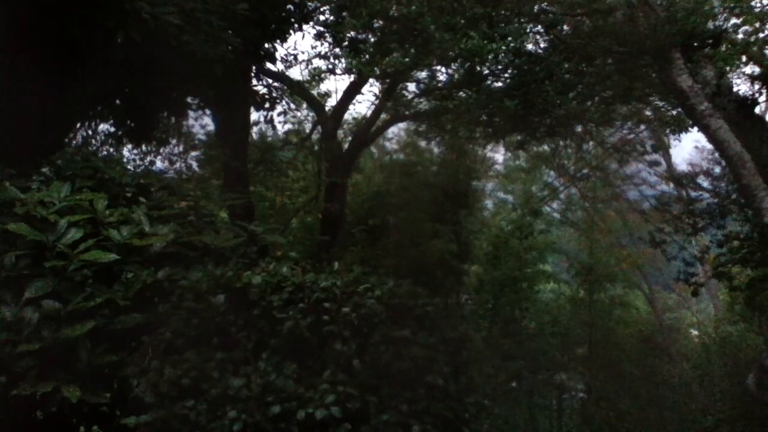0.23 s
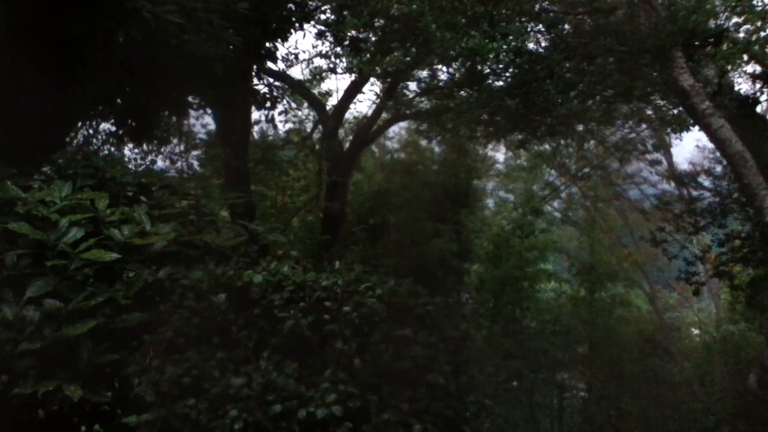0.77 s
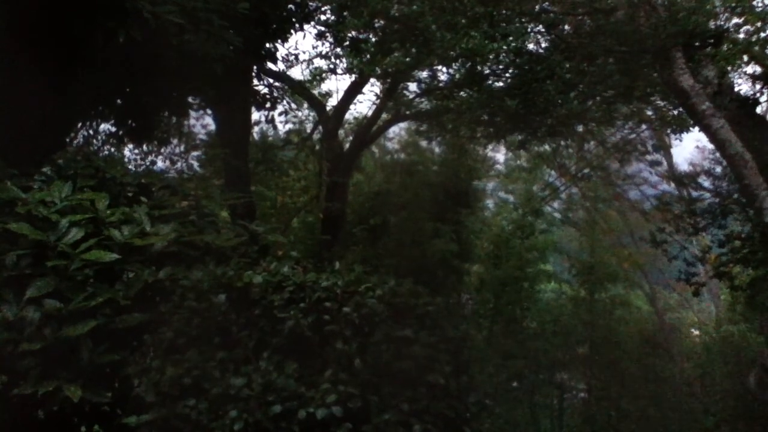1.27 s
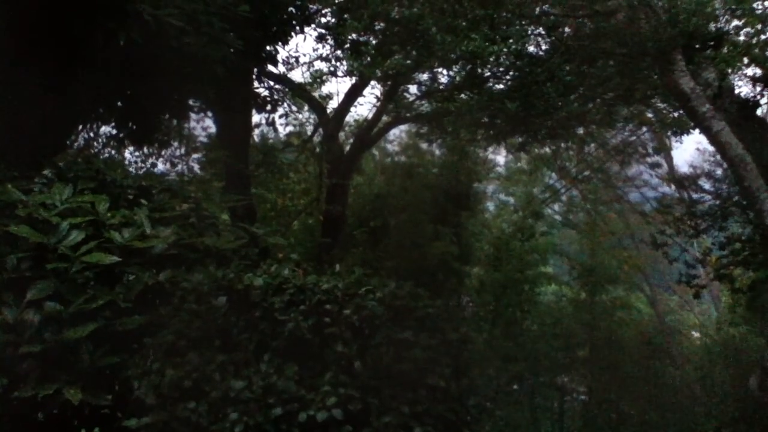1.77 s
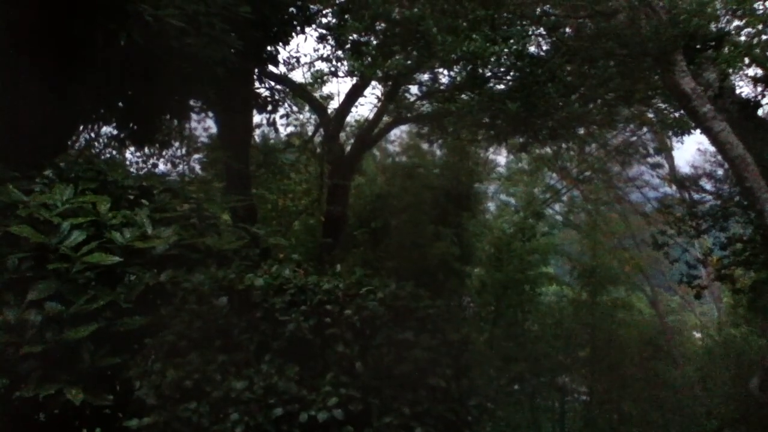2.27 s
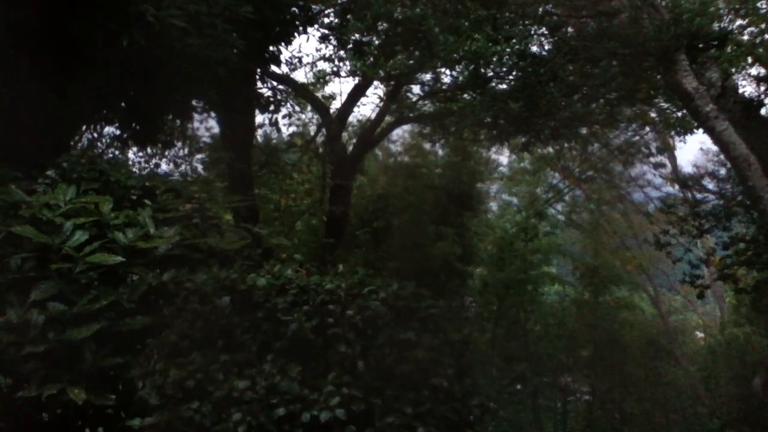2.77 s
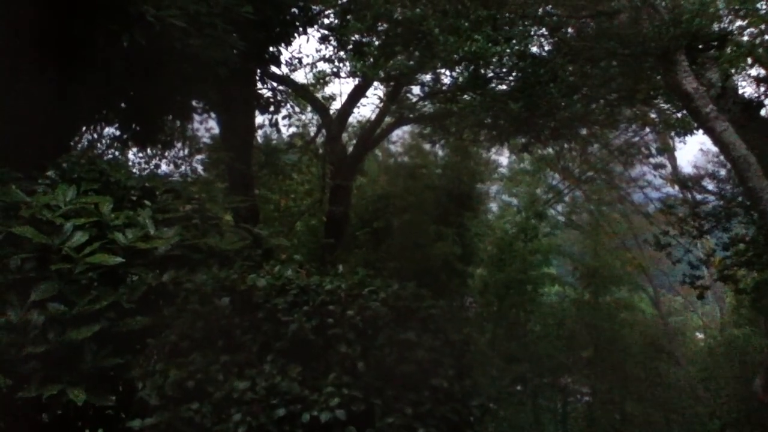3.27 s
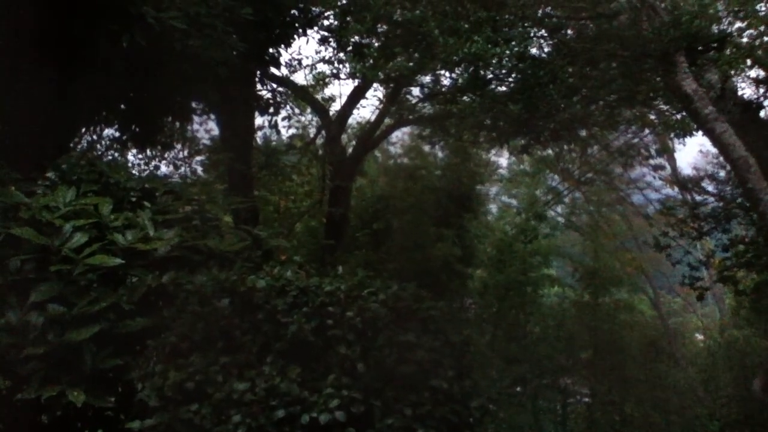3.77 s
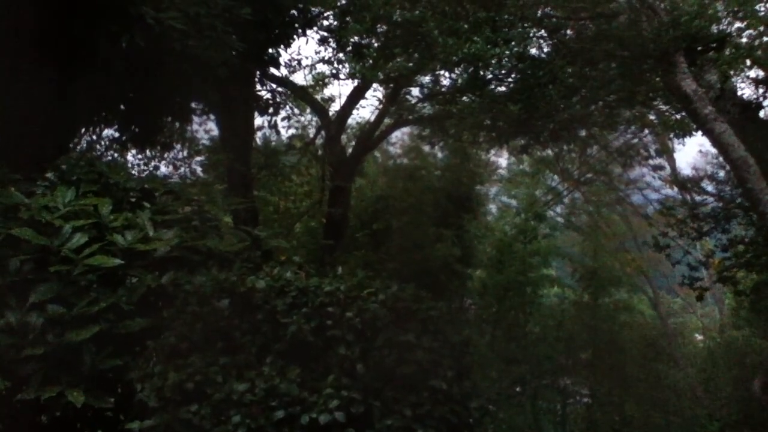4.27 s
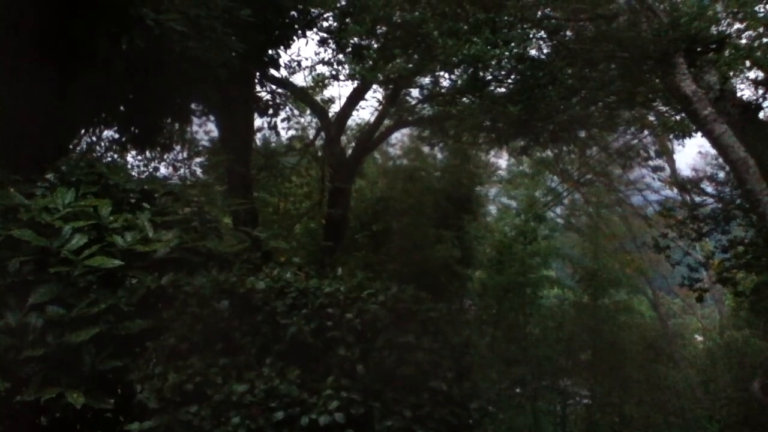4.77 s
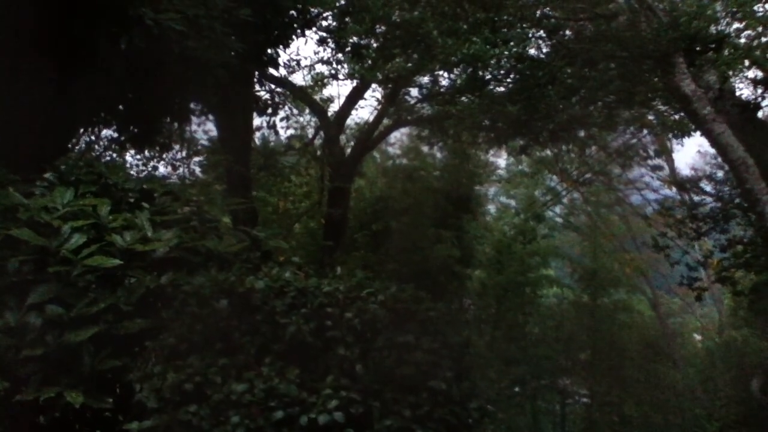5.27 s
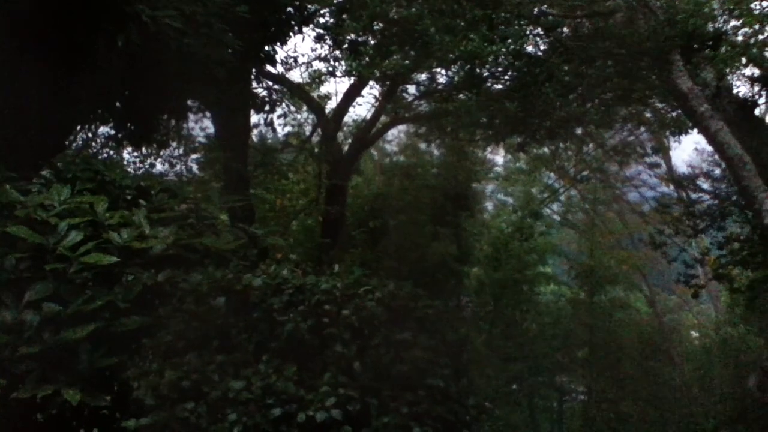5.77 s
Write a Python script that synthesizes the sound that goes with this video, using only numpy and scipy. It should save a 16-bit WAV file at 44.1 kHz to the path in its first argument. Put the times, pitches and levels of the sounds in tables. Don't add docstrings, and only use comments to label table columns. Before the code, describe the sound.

A near cicada shrills without pause, harsh and very high, over distant buzzing insects, thin cricket trills and a faint stream in dusky forest.

```python
import sys
import numpy as np
from scipy import signal
from scipy.fft import rfft, irfft, next_fast_len
from scipy.io import wavfile
from scipy.ndimage import uniform_filter1d

SR = 44100
rng = np.random.default_rng(int(sys.argv[2]) if len(sys.argv) > 2 else 0)


def inscribe(sig):
    pcm = np.round(np.clip(np.atleast_2d(sig).T, -1, 1) * 32767)
    wavfile.write(sys.argv[1], SR, pcm.astype(np.int16))


def ratio(d):
    e = np.asarray(d, float) / 20
    return 10 ** e


N = 265923
T = np.arange(N) / SR


def level(x, db):
    return x * ratio(db) / np.sqrt(np.mean(x ** 2))


def curves(table):
    s, *columns = np.transpose(table)
    return [np.interp(T, s, c) for c in columns]


def colour(x, points):
    hz, db = np.transpose(points)
    size = next_fast_len(N)
    f = np.maximum(np.arange(size // 2 + 1) * SR / size, 1)
    gain = ratio(np.interp(np.log(f), np.log(hz), db))
    return irfft(rfft(x, size) * gain, size)[:N]


def walk(rate_hz):
    hold = int(SR / rate_hz)
    steps = np.repeat(rng.standard_normal(N // hold + 1), hold)
    return 1.3 * uniform_filter1d(uniform_filter1d(steps, hold), hold)[:N]


def ticks(rate_hz):
    turns = np.cumsum(rate_hz) / SR
    return np.interp(np.arange(1, int(turns[-1])), turns, T)


def rings(times, hz, width_hz, size, count=256):
    at = np.ceil(times * SR).astype(int)[:, None] + np.arange(count)
    t = at / SR - times[:, None]
    envelope = size[:, None] * t * np.exp(-2 * np.pi * width_hz * t)
    wave = envelope * np.sin(2 * np.pi * hz[:, None] * t)
    return np.bincount(np.clip(at, 0, N).ravel(), wave.ravel(), N + 1)[:N]


def trunks(x, t60_s, wet_db):
    t = np.arange(int(t60_s * SR)) / SR
    decay = np.exp(-np.log(1000) * t / t60_s)
    echoes = rng.standard_normal(len(t)) * decay * np.minimum(t / 0.0093, 1)
    echoes = echoes / np.sqrt(np.sum(echoes ** 2))
    return x + ratio(wet_db) * signal.fftconvolve(x, echoes)[:N]


# frequency in Hz, noise density in dB per Hz.
AIR_HZ_DB = [(15, -57.5), (25, -14), (124, -4.5), (343, -9.5), (397, -11.5), (450, -11), (711, -16.5),
             (1600, -16), (1890, -9.5), (2100, -7), (2430, -12.5), (2920, -10.5), (3600, -3.5),
             (4680, -8.5), (7920, -120)]


def air():
    return level(ratio(0.5 * walk(2.32)) * colour(rng.standard_normal(N), AIR_HZ_DB), -52)


def tree_crickets(count=24):
    out = 0
    for spread in np.linspace(-1, 1, count):
        times = ticks(38 * (1 + 0.15 * walk(1.5)))
        hz = 2110 + 105 * spread + 8 * rng.standard_normal(400)[:len(times)]
        late_s = 0.02 * rng.random()
        pulses = rings(times - late_s, hz, 16.3, 1 + 0 * times, count=1536)
        out = out + ratio(3.4 * walk(4.36)) * pulses
    early_db, settle_s = 4.5, 0.4
    return ratio(early_db * np.exp(-T / settle_s)) * level(trunks(out, 0.84, 1), -56)


def throbs(calls, drum_hz, width_hz):
    throb_s = 0.32
    out = 0
    for middle_s, snap_hz, db in calls:
        u = np.arange(-0.5, 0.5, 1 / (snap_hz * throb_s))
        times = np.maximum(middle_s + u * throb_s, 0)
        size = np.cos(np.pi * u) * (times > 0)
        throb = rings(times, drum_hz + 0 * u, width_hz, size)
        out = out + level(throb, db + 10 * np.log10(throb_s * SR / N))
    return trunks(out, 0.27, 0.74)


# middle in seconds, pulse rate in Hz, level in dB.
CROAKS = [
    (4.3, 323, -74.5),
    (5.4, 319.6, -75),
]


def frog():
    return throbs(CROAKS, drum_hz=1150, width_hz=220)


# middle in seconds, snap rate in Hz, level in dB.
FAINT_THROBS = [(.05, 341, -67), (.78, 340.6, -64), (1.15, 328, -65.5), (1.68, 342, -78), (2.4, 345, -66),
                (3.03, 342.5, -62), (3.76, 353.5, -64), (4.5, 340, -68), (5.22, 332, -68), (5.92, 355, -63)]


def faint_caller():
    return throbs(FAINT_THROBS, drum_hz=3440, width_hz=550)


def fading_cricket():
    times = ticks(55 + 6 * walk(6))
    hz = 4150 + 25 * rng.standard_normal(600)[:len(times)]
    trill = rings(times, hz, 40, 1 + 0 * times, count=1024)
    fade_db_s = 4
    return ratio(1.5 * walk(5.5) - fade_db_s * T) * level(trunks(trill, 0.41, 2.3), -54)


# start in seconds, peak in dB, pitch in Hz.
PIP_EVENTS = [(5.1397, -34, 6000), (5.39, -33, 5970), (5.552, -31, 5990), (5.7116, -36, 6340),
              (5.806, -29, 6000)]


def crickets():
    times = ticks(31 + 3 * walk(5))
    hz = 4700 + 12 * rng.standard_normal(400)[:len(times)]
    trill = rings(times, hz, 21, 1 + 0 * times, count=2048)
    mean_db, gain_db_s, depth_db = -55, 2.0, 5
    phrase_s, phrase_top_s = 0.699, 3.53
    phrase = np.cos(2 * np.pi * (T - phrase_top_s) / phrase_s)
    phrase_db = mean_db + gain_db_s * T + depth_db * phrase
    s, db, pip_hz = np.transpose(PIP_EVENTS)
    pips = rings(s, pip_hz, 42, 480 * ratio(db), count=2048)
    return ratio(phrase_db) * level(trill, -9) + trunks(pips, 0.3, -14)


# start in seconds, length in seconds, pitch in Hz, level in dB.
RASP_EVENTS = [
    (.2, 0.091, 4900, -49),
    (.67, 0.11, 4900, -47),
    (1.27, 0.075, 5100, -50),
]


def rasps():
    out = 0
    for s, length_s, hz, db in RASP_EVENTS:
        u, v = rng.random((2, 60))
        clicks = rings(s + length_s * u, hz + 900 * (v - 0.5), 210, 9000 * np.sin(np.pi * u))
        out = out + ratio(db) * clicks
    return trunks(out, 0.22, -4)


# pitch in Hz, width in Hz, level in dB.
NEIGHBOUR_MODES = [
    (7904, 43, -41),
    (8300, 36, -43.5),
]


def neighbour():
    times = ticks(300 + 60 * walk(200))
    fade_db_s = 1.06
    size = ratio(2.3 * rng.standard_normal(3000)[:len(times)] - fade_db_s * times)
    out = 0
    for hz, width_hz, db in NEIGHBOUR_MODES:
        out = out + level(rings(times, hz + 0 * times, width_hz, size, count=1024), db)
    return trunks(out, 0.37, 0.57)


# frequency in Hz, gain in dB.
FAR_HZ_DB = [(2200, -8), (3300, 1), (3900, 3.5), (5500, 0), (5900, -0.5), (7000, -10)]


def far_buzzers(count=9):
    climb_at_s, climb_s = 3.74, 0.7
    climb = 1 / (1 + np.exp((climb_at_s - T) / climb_s))
    low_hz = 3987 + 170 * climb
    high_hz = 5098 + 452 * climb
    out = 0
    for place in np.linspace(0, 1, count):
        times = ticks((128 + 46 * place) * (1 + 0.012 * walk(30)))
        drum_hz = low_hz + (high_hz - low_hz) * place + 40 * walk(2.58)
        pitch_hz = np.interp(times, T, drum_hz)
        db = 1.5 * walk(3.33) + place * (2.83 * T - 3.5)
        size = ratio(2.3 * rng.standard_normal(1500)[:len(times)])
        out = out + ratio(db) * rings(times, pitch_hz, 315, size)
    out = colour(trunks(out, 0.5, 6.6), FAR_HZ_DB)
    out = out / np.sqrt(uniform_filter1d(out ** 2, size=SR))
    octave = level(colour(out ** 2, [(8500, -50), (10300, 2), (12500, -6), (15500, -20)]), -26)
    octave = ratio(7 * climb) * octave
    swell_s, swell_top_s, swell_db, swell_ends_s = 0.77, 1.347, 1.5, 5.8
    flatten = np.maximum(1 - T / swell_ends_s, 0)
    swell = swell_db * flatten * np.cos(2 * np.pi * (T - swell_top_s) / swell_s)
    start_db, gain_db_s, climb_db = -45, 0.86, 3
    return ratio(start_db + gain_db_s * T + climb_db * climb + swell) * (out + octave)


# time in seconds, snap rate in Hz, muscle beat in Hz (half speed until it locks).
SONG_RATES = [(0, 405.99, 64), (0.5, 405.12, 65), (1.2, 405.21, 59), (1.75, 405.9, 54), (1.76, 406.1, 109),
              (2.1, 406.57, 108.3), (2.85, 407.85, 108.3), (3.1, 408.78, 109), (3.5, 409.13, 107),
              (3.9, 409.02, 107), (4.2, 408.49, 105.2), (4.6, 408.21, 106), (5.1, 408.71, 105),
              (5.5, 409.65, 103.9), (6.03, 410.25, 104.5)]
# start in seconds, sway in us, second-harmonic sway in us, its lag in rad.
SWAY_PHASES = [
    (0, 52, 15, 3.0),
    (1.76, 17, 12, 6.2),
    (2.9, 29.5, 15.5, 3.3),
    (5.28, 32, 23.5, 0),
]
# sway in dB, lag in rad, second-harmonic sway in dB, its lag in rad.
ACCENT_PHASES = [(3, 3.2, 2.8, 2.6), (2, 2, 1.8, .5), (2, 1.1, 2.2, .1), (.5, .2, 1.3, 2.6)]
# pitch in Hz, width in Hz.
DRUM_RING = [(8302, 257), (8220, 276), (8241, 257), (8230, 275)]
# from in seconds, to in seconds, unsteadiness in Hz.
BEAT_WAVERS = [
    (0, .7, 6),
    (1.2, 1.76, 6),
    (2.86, 2.98, 3),
    (5.3, 6.1, 3),
]
# frequency in Hz, gain in dB.
BODY_HZ_DB = [(4500, -2), (6300, 7), (6915, 9), (6960, 14), (7200, 4), (7460, 14.5), (7700, 8),
              (8000, -1.5), (8300, -7), (8600, -0.5), (9000, 4.5), (9500, 11.5), (10300, 4.5),
              (12000, 10.5), (15500, -6)]
# frequency in Hz, noise density in dB per Hz.
HAZE_HZ_DB = [(3240, -48), (5500, -16.5), (6540, -8), (7050, -4.5), (7200, 6), (8050, -41), (8570, -53),
              (9090, -4), (9780, -13.5), (10200, -14), (13300, -55), (22000, -120)]
# time in seconds, level in dB.
NEAR_LEVEL = [(0.0, -24.5), (2.77, -26), (2.84, -25.5), (5.1, -25.5), (5.26, -26), (6.03, -25.5)]


def near_cicada():
    snap_hz, beat_hz = curves(SONG_RATES)
    times = ticks(snap_hz + 0.1 * walk(25))
    loose_hz = 1.3 + sum(hz * (T >= a) * (T < b) for a, b, hz in BEAT_WAVERS)
    turns = np.cumsum(beat_hz + loose_hz * walk(18)) / SR
    beat = 2 * np.pi * np.interp(times, T, turns)
    start, *sway = np.transpose(SWAY_PHASES)
    phase = np.searchsorted(start, times) - 1
    us1, us2, lag = (column[phase] for column in sway)
    db1, lag1, db2, lag2 = np.transpose(ACCENT_PHASES)[:, phase]
    drum_hz, width_hz = np.transpose(DRUM_RING)[:, phase]
    time_chance, size_chance = rng.standard_normal((N // 90, 2))[:len(times)].T
    shift_us = us1 * np.cos(beat) + us2 * np.cos(2 * beat + lag) + 4 * time_chance
    size = ratio(db1 * np.cos(beat + lag1) + db2 * np.cos(2 * beat + lag2) + 1.21 * size_chance)
    size = size * width_hz ** (3 / 2)
    snaps = rings(times + 1e-6 * shift_us, drum_hz, width_hz[:, None], size)
    song = trunks(colour(snaps, BODY_HZ_DB), 0.3, -4)
    haze = level(colour(rng.standard_normal(N), HAZE_HZ_DB), -15)
    return ratio(curves(NEAR_LEVEL)[0]) * (level(song, -0.7) + haze)


def scene():
    background = air() + tree_crickets() + frog() + faint_caller() + fading_cricket()
    middle = crickets() + rasps() + neighbour() + far_buzzers()
    return (background + middle + near_cicada())[None]


def roll_off(x):
    return signal.sosfilt(signal.butter(12, 15250, fs=SR, output="sos"), x)


# frequency in Hz, gain in dB.
MIC_HZ_DB = [(28, -9), (48, 0), (9500, 0), (10400, 6), (11000, 2), (13000, 9), (15000, 13)]


def record(dry):
    return roll_off(colour(dry[0], MIC_HZ_DB)[None])


dry = scene()
out = record(dry)
inscribe(out)
```